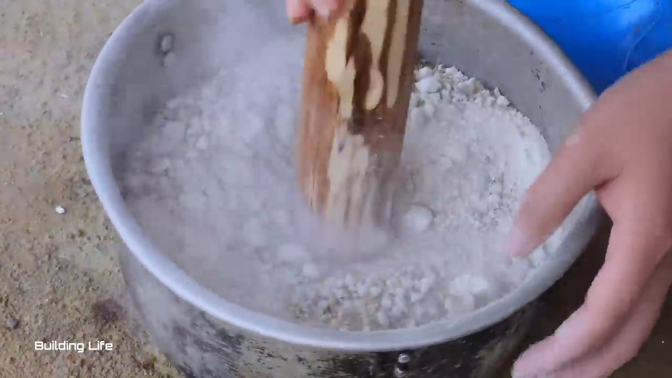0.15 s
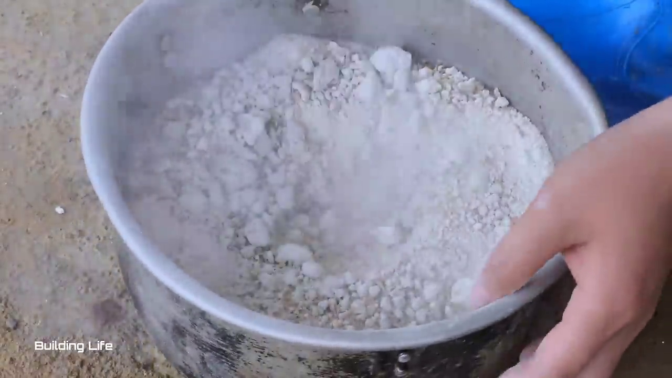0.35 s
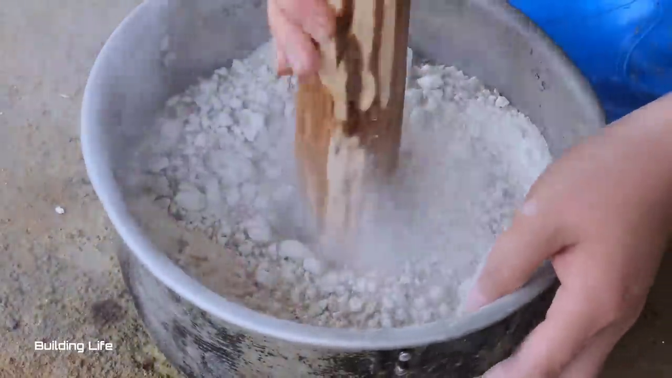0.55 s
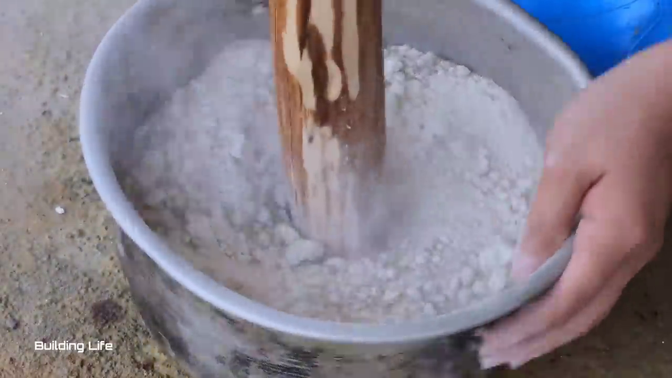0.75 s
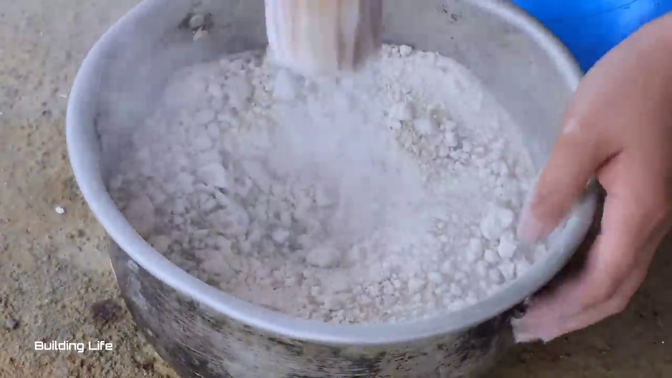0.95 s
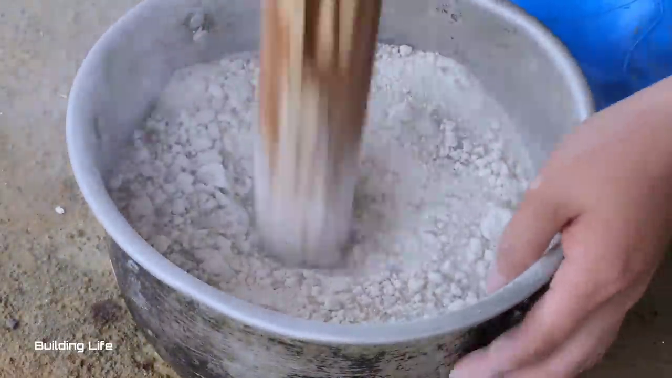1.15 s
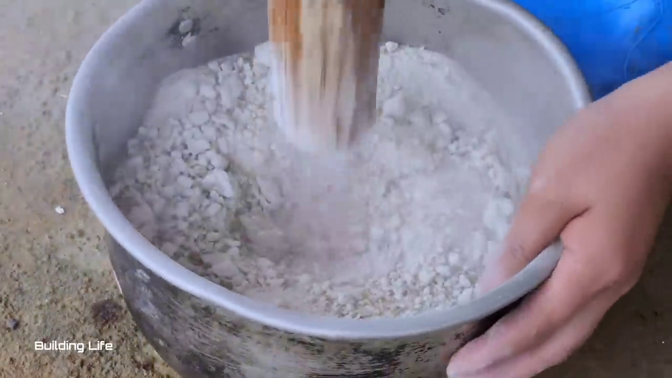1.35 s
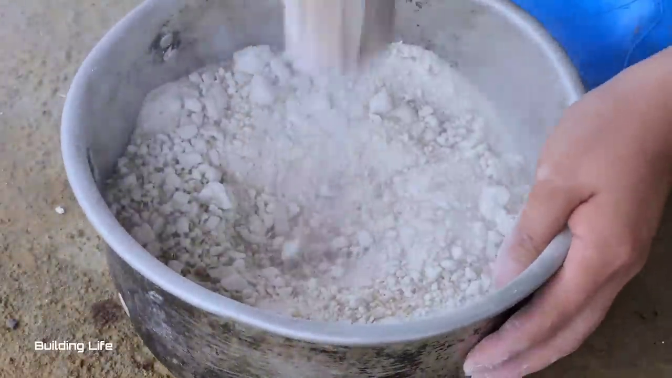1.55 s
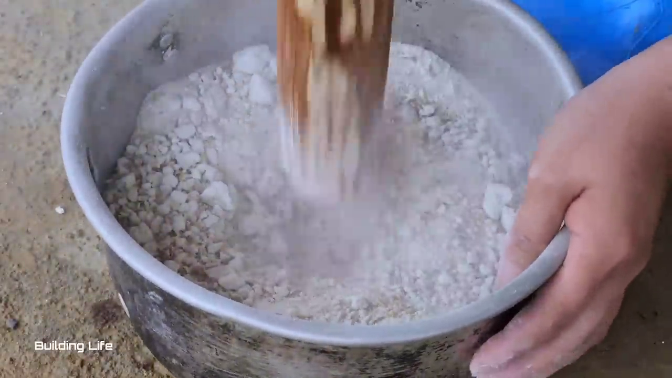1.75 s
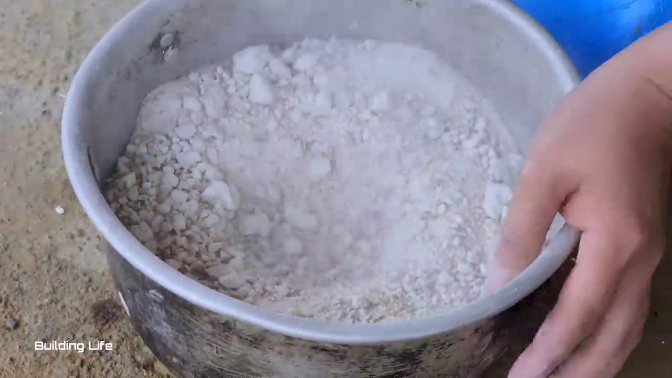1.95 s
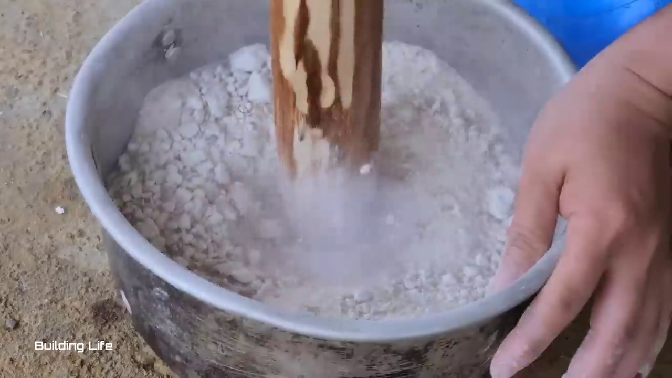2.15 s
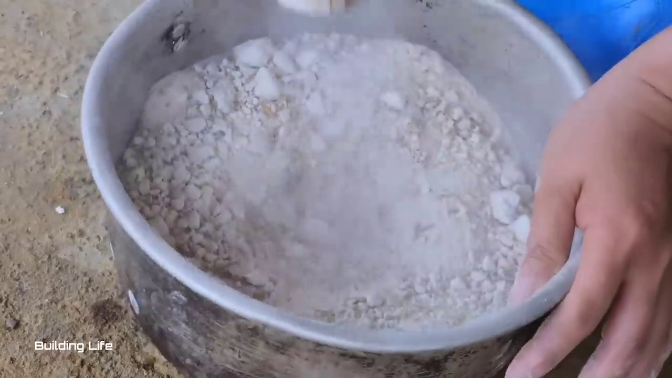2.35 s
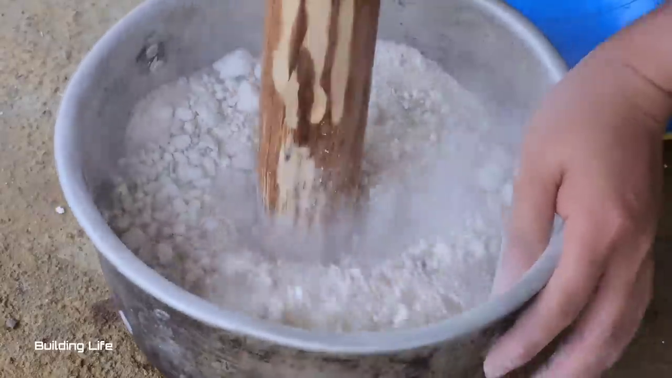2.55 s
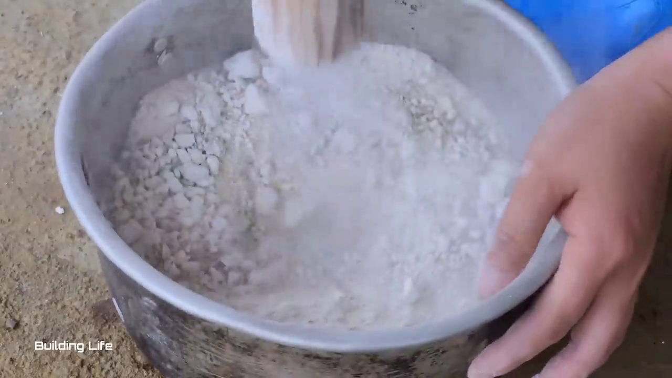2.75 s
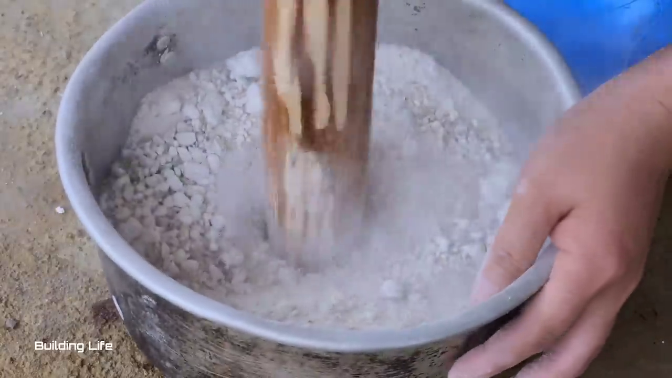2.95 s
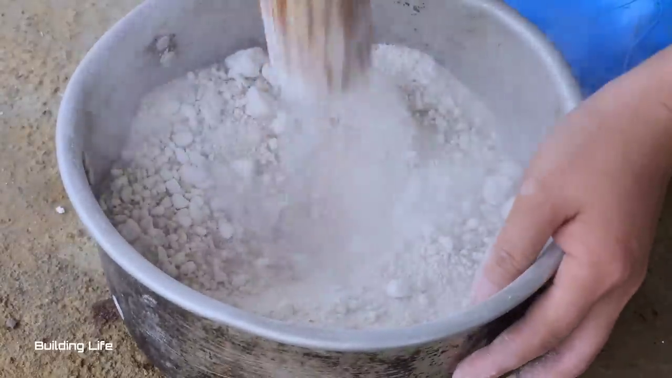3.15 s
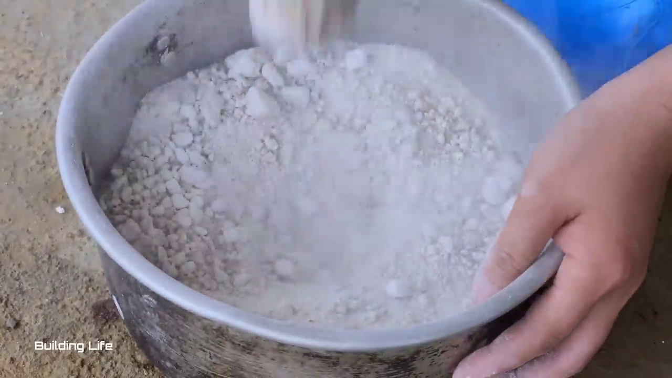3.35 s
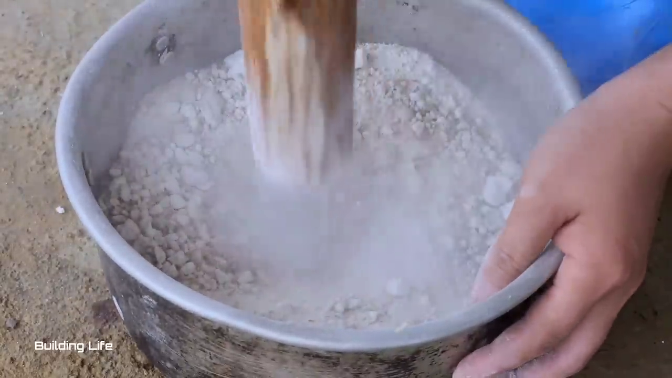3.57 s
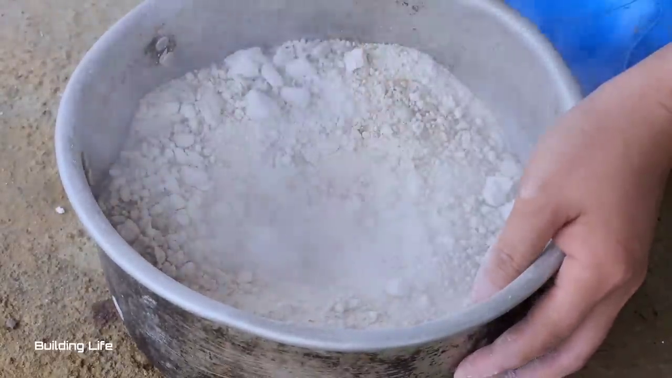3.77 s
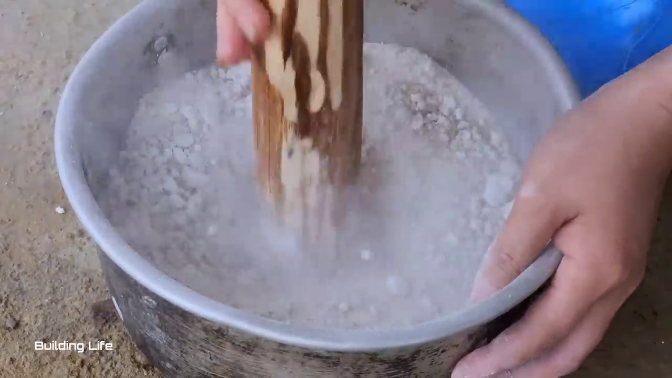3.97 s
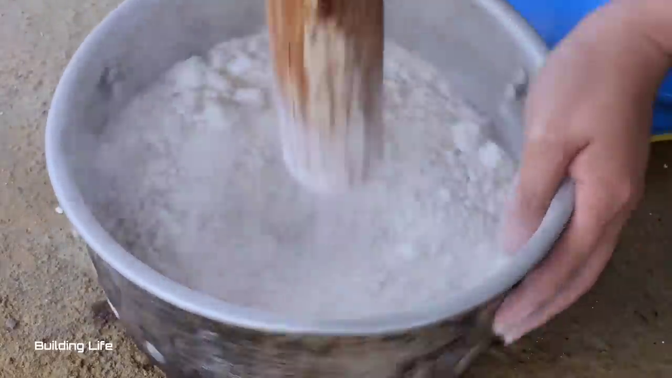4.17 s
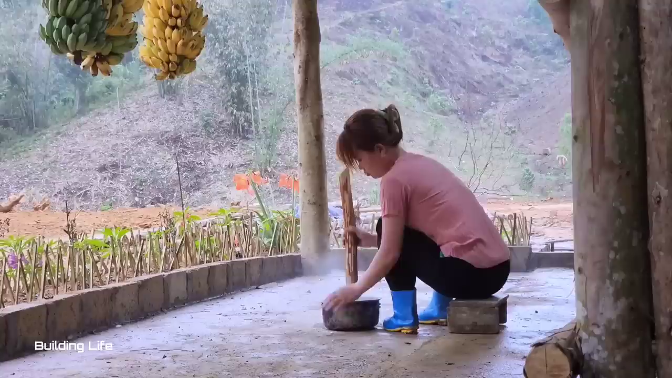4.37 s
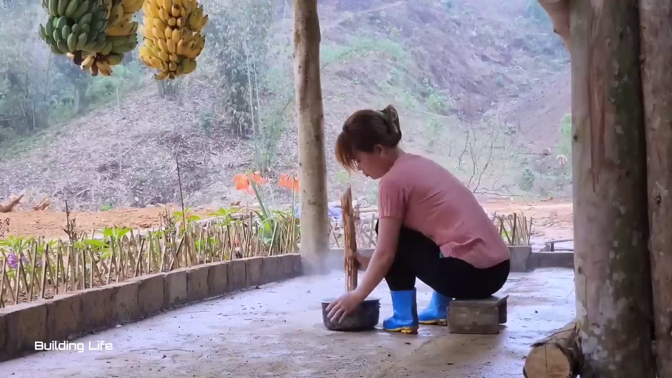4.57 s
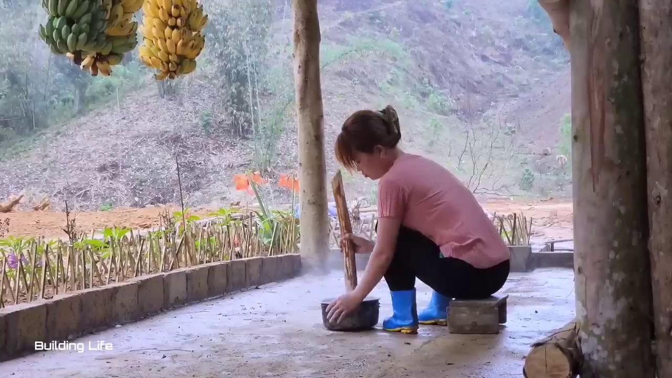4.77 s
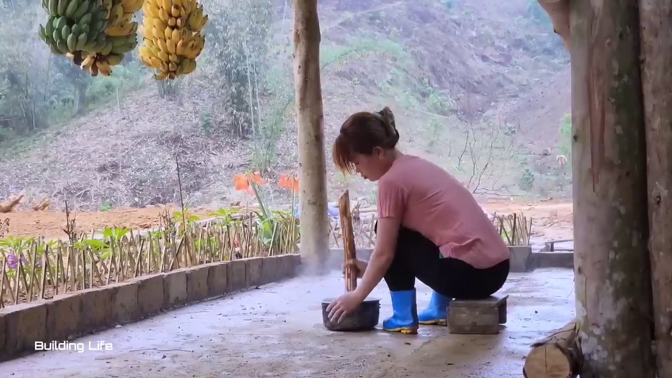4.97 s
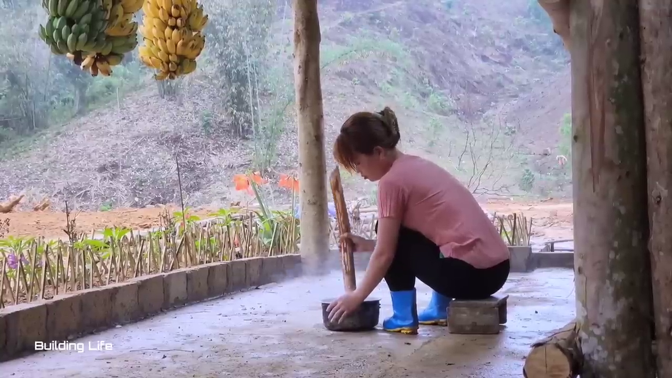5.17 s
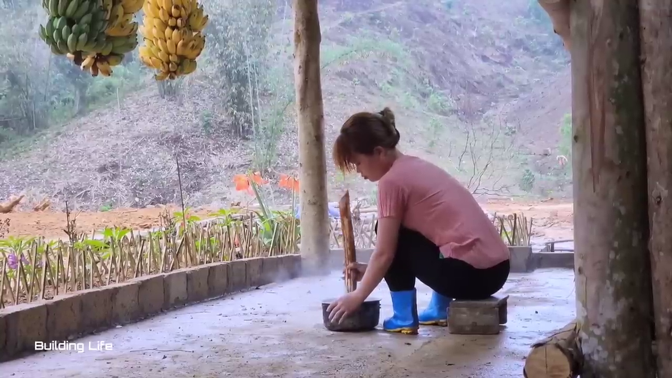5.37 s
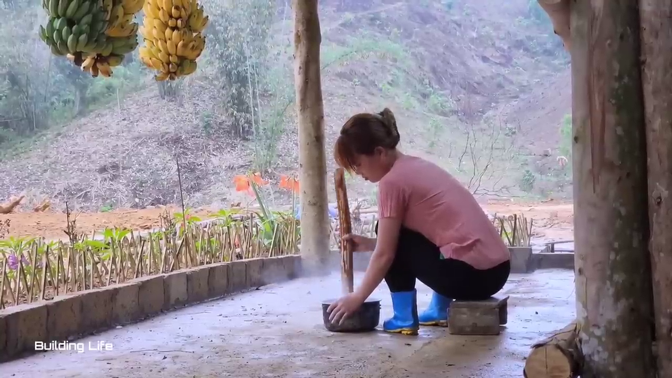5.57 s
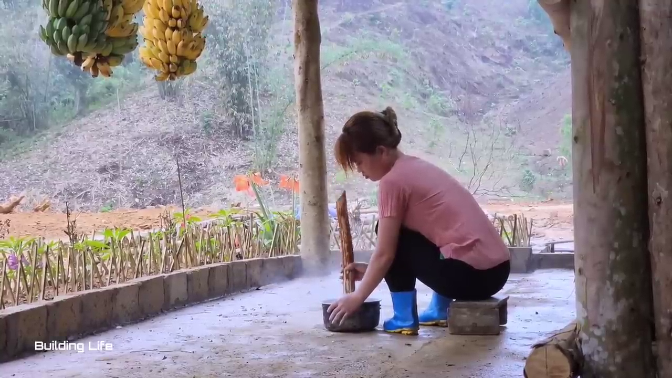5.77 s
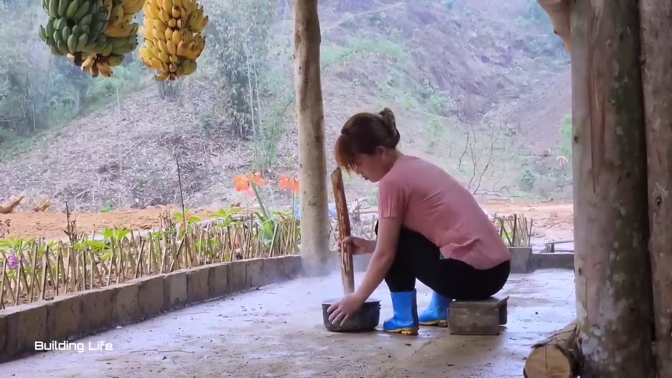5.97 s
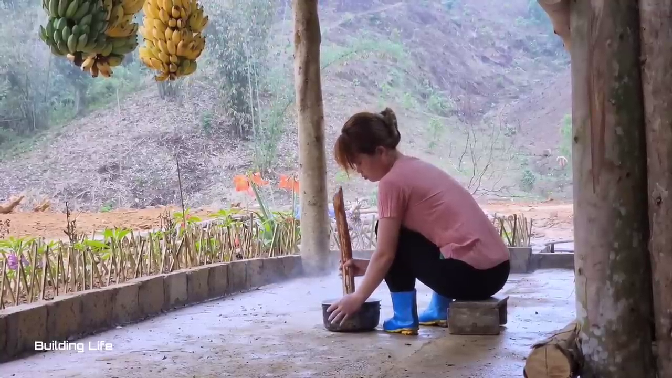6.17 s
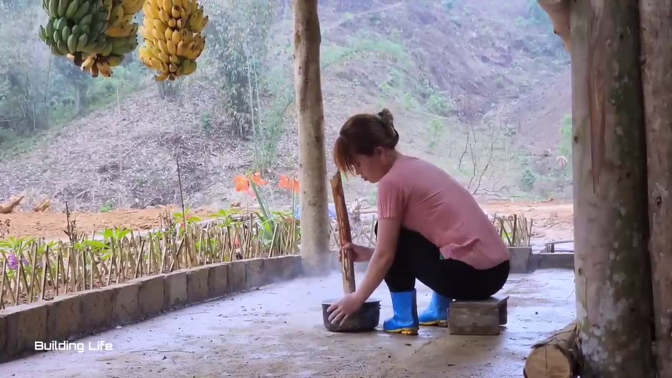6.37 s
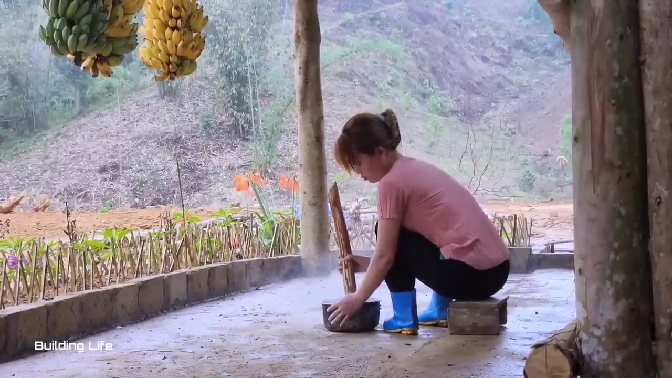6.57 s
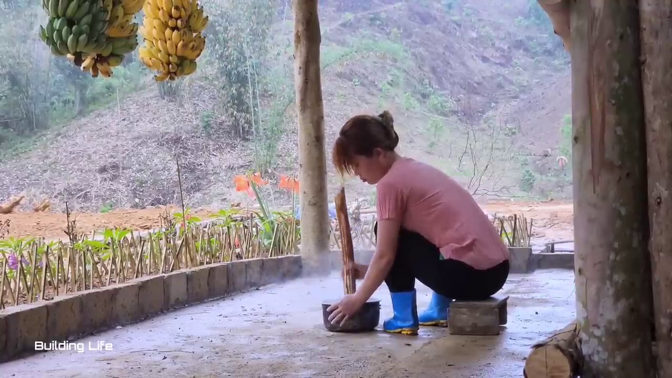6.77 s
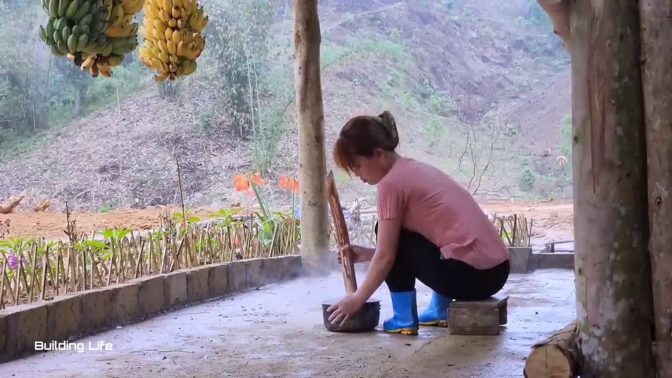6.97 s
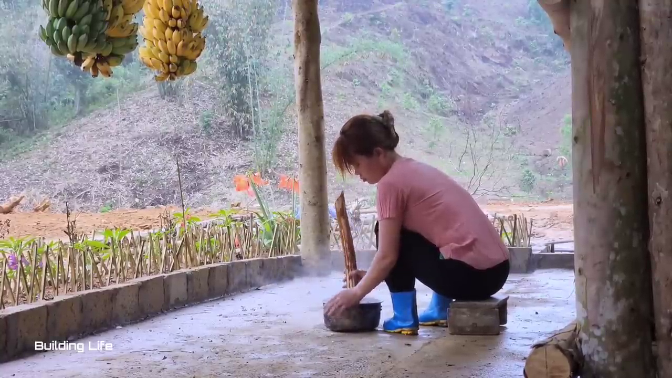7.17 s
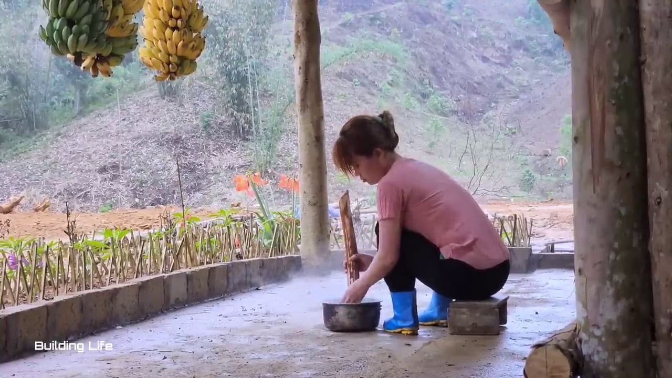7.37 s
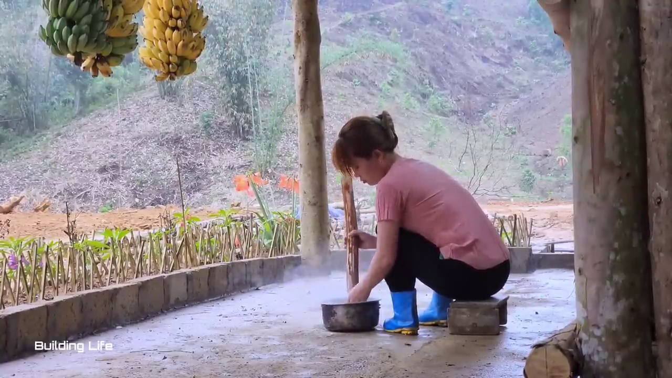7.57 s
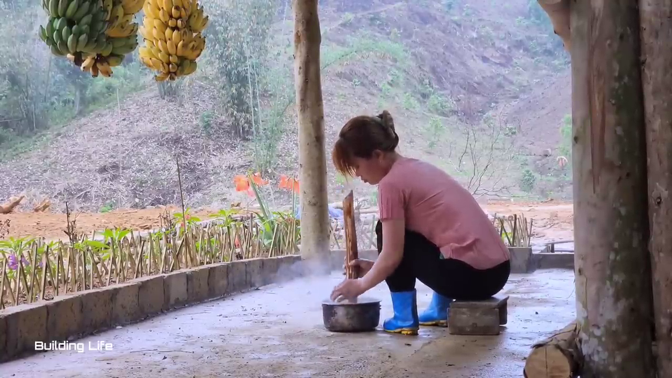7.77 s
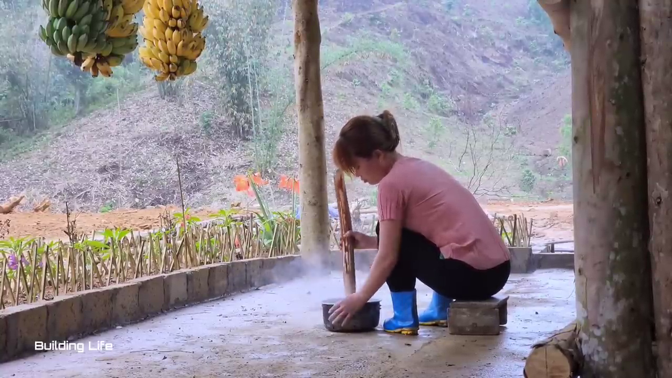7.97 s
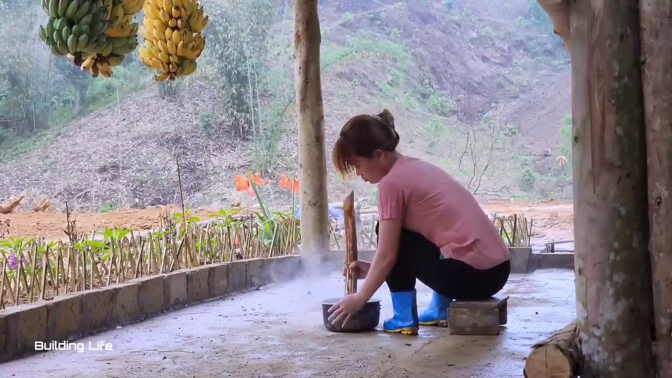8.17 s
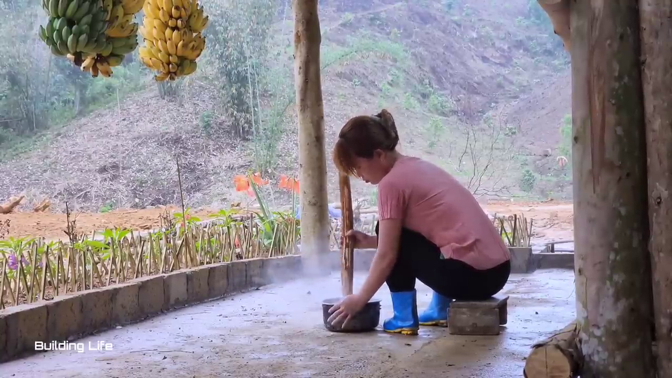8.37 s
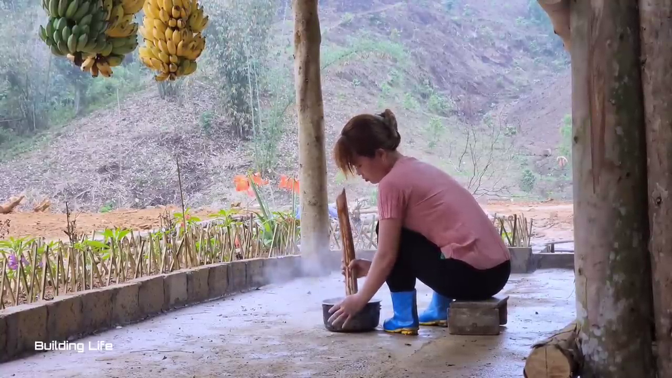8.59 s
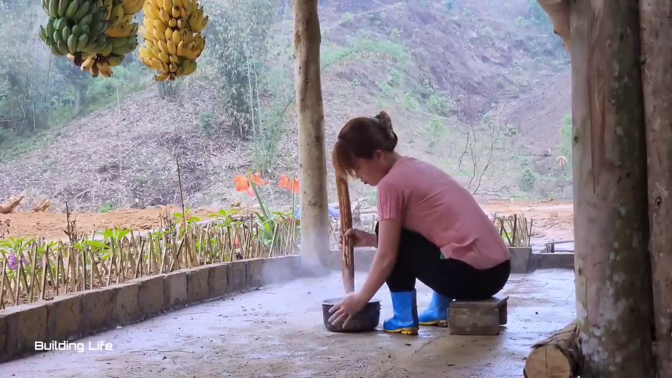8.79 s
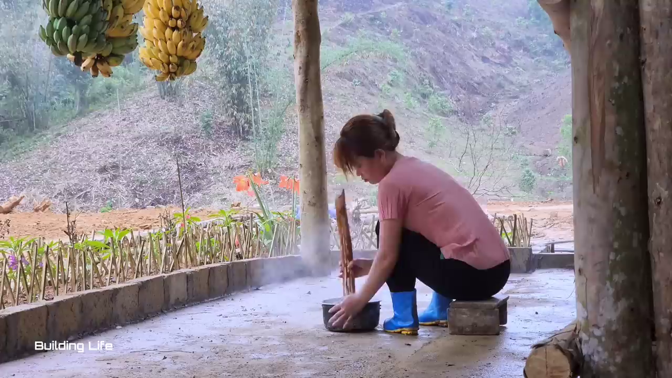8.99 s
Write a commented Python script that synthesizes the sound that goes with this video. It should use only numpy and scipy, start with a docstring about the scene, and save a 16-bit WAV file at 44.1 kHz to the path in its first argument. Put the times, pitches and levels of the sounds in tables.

```python
"""On a concrete porch, a wooden pestle pounds dry lumps in a metal pot, first close by, then a few metres off.
Each blow is a burst of crushed grit (uneven noise), then a thump of pot and slab (fading sine waves).
Between blows the pot is dragged round (noise through its ringing), crumbs tick and soft tones slide by.
The porch roof echoes it all (fading noise) over a faint country background with insects (filtered noise)."""
import sys
import numpy as np
from scipy import signal
from scipy.fft import rfft, irfft
from scipy.io import wavfile
from scipy.ndimage import uniform_filter1d

SR = 44100
rng = np.random.default_rng(int(sys.argv[2]) if len(sys.argv) > 2 else 0)


def wav_record(signal):
    """Record a signal, one row per channel, as 16-bit PCM in the file named by sys.argv[1]."""
    frames = np.transpose(np.atleast_2d(signal))
    bounded = np.clip(frames, -1, 1)
    # unit amplitude maps onto the largest positive 16-bit level
    quanta = np.round(bounded * 32767).astype(np.int16)
    wavfile.write(sys.argv[1], SR, quanta)


N = 398223

# Levels are those of each layer before it reaches the microphone.
# Country murmur and hiss: (frequency [Hz], relative level [dB])
COUNTRY_COLOUR = [(12, 6.5), (30, 3.5), (87, -1), (145, 0), (229, -6), (489, -21), (1000, -25), (2160, -31),
                  (4370, -32.5), (8000, -31), (10400, -47), (14800, -37.5), (16000, -52.5)]
# Insect bands: (centre [Hz], distance to the 20 dB weaker edges [Hz], average level [dB])
INSECT_BANDS = [(4500, 600, -84), (6500, 450, -81)]
# Pot dragged over the slab: (start [s], hold [s], rasp level [dB], rumble level [dB])
DRAGS = [(0.018, 0.056, -40.5, -38), (0.699, .04, -53, -40.5), (0.786, .11, -37, -34),
         (1.392, 0.11, -48, -37), (2.523, 0.021, -55.5, -44.5), (4.111, 0.092, -52.5, -59.5),
         (4.239, 0.056, -42.5, -37), (4.452, 0.11, -53.5, -41.5), (4.666, 0.03005, -54, -40.5),
         (5.631, 0.17, -67.5, -43), (7.272, .12, -55.5, -39), (7.599, .05, -71.5, -51.5)]
# Rasp of grit under the pot: (frequency [Hz], relative level [dB])
RASP_COLOUR = [(210, -43.5), (350, -23.5), (1010, -1), (1260, -7), (2030, -1), (2600, -7), (5310, -11),
               (10100, -14), (14800, -16.5), (16000, -41.5)]
# Crumbs and small knocks: (time [s], grit peak [dB], dust peak [dB], low knock peak [dB])
CRUMBS = [(0.019, -20, -28.5, -29.5), (0.326, -37.5, -48.5, -43.5), (0.704, -34, -43, -33.5),
          (0.73, -52, -34.5, -34.5), (0.772, -37, -40.5, -26.5), (0.797, -46, -16.5, -32.5),
          (0.848, -21, -42, -31), (0.864, -43, -25, -30.5), (0.89, -23.5, -39, -28.5),
          (0.928, -30.5, -34, -39.5), (1.053, -31, -21.5, -52), (1.277, -22.5, -56.5, -21.5),
          (1.386, -37, -46.5, -36.5), (1.426, -39, -36, -34.5), (1.474, -30.5, -36.5, -26.5),
          (2.511, -62, -41, -40.5), (2.779, -44, -55.5, -40), (2.835, -34.5, -30, -45.5),
          (3.289, -47, -36.5, -61), (3.305, -53.5, -32.5, -63.5), (4.117, -44, -34, -37),
          (4.189, -52, -32.5, -54.5), (4.316, -34.5, -50.5, -29), (4.392, -35.5, -40.5, -31.5),
          (4.448, -44, -59.5, -29), (4.487, -43.5, -60, -40), (4.505, -47, -33, -29),
          (7.379, -61, -58, -41.5), (7.591, -36.5, -65, -50), (7.736, -58, -48.5, -47.5),
          (8.07, -65, -57, -56)]
# Blows: (time [s], crunch peak [dB], slab thump peak [dB], pot bottom peak [dB], pot bottom pitch [Hz],
# side wall peak [dB], crush time scale [ms], time the pot stays pressed down [ms],
# treble of the grit over the crunch [dB])
BLOW_LIST = [(0.045, -26, -47.5, -18.5, 171.5, -32, 13, 19, -3),
             (0.147, -4, -9, -16, 211, -27.5, 4.3, 11, -9),
             (0.591, -3.5, -8.5, -22.5, 229, -12, 7.1, 13, -7),
             (1.231, -5, -11.5, -11.5, 206.5, -20.5, 7.5, 14, -9),
             (1.678, -4, -14, -25.5, 154.2, -14.5, 5.9, 12, -13.5),
             (2.118, -4.5, -13, -16.5, 186, -17.5, 8.8, 11, -11),
             (2.571, -3.5, -10, 1.5, 158.3, -19.5, 5, 8.6, -7),
             (3.018, -6.5, -9.5, -13, 196.5, -12.5, 6, 18, -7.5),
             (3.477, -5.5, -12.5, -17, 182.5, -8, 3.2, 23, -8.5),
             (3.938, -3.5, -11.5, -15, 199, -9.5, 5.4, 21, -12),
             (4.55, -6.5, -11.5, -5.5, 191.6, -23, 8.3, 13, -8.5),
             (4.568, -14.5, -11, -12.5, 148, -17.5, 3.4, 19, -9),
             (4.646, -24.5, -35.5, -45, 196, -27, 10.7, 18, 1),
             (5.034, -19, -45.5, -14, 174.9, -28, 6.3, 21, -2.5),
             (5.411, -23.5, -43.5, -23, 172.8, -24.5, 11, 12, -0.5),
             (5.779, -29.5, -27, -43, 134.5, -31.5, 14, 32, 4.5),
             (6.144, -27.5, -49.5, -21, 180.9, -33.5, 8.9, 21, 1),
             (6.494, -21, -32.5, -13.5, 173.1, -40, 5.6, 32, -2),
             (6.852, -17, -43.5, -15, 180.6, -31, 10, 27, -10),
             (7.214, -18.5, -38.5, -18.5, 173.1, -32, 16, 32, -9.5),
             (7.827, -25, -36, -25, 188.3, -32, 8.7, 21, -1.5),
             (8.194, -30, -31, -32.5, 179, -34.5, 10, 18, 1.5),
             (8.567, -28.5, -32.5, -27, 182.3, -33.5, 8.7, 32, 1),
             (8.962, -31.5, -34.5, -38.5, 127, -31.5, 8, 37, 1)]
# The pot springs back and lands again: (time [s], peak [dB], pitch [Hz])
REBOUND_LIST = [(0.172, -15, 149), (0.61, -9.5, 118.9), (1.254, -8, 156), (1.438, -25.5, 143),
                (1.698, -14.5, 124), (2.14, -5, 152.9), (2.591, -9.5, 172), (2.609, -9.5, 110),
                (3.956, -13, 106.6), (2.685, -25.5, 166.1), (4.578, -16, 157.7), (7.862, -22.5, 107.2),
                (7.883, -25.5, 135.2)]
# Body of the crunch, its treble, and settling powder coloured by the pot:
# (frequency [Hz], relative level [dB])
GRIT_COLOUR = [(300, -21), (700, -8.5), (1500, -0.5), (2400, -5.5), (3500, -14), (5000, -37)]
DUST_COLOUR = [(2500, -28), (4000, 3.5), (8000, 4), (12000, -3.5), (15800, -4.5)]
POWDER_COLOUR = [(350, -22.5), (700, -0.5), (1000, -5), (1400, -1.5), (2200, -2.5), (2600, -10), (3300, -9),
                 (5000, -30)]
# Ways the parts ring, before small random changes of pitch and level; t60 is the time to fade by 60 dB.
# Slab, loose pot bottom, air in the pot, wall damped by hand and powder, broad low ringing of the side wall:
# (frequency [Hz], relative level [dB], t60 [s])
SLAB_MODES = [(80, -6.5, 1), (104.4, 1.5, 0.52), (114, -0.5, .14), (131, -3.5, 0.63)]
BOTTOM_MODES = [(184, 0.8, 0.091)]
AIR_MODES = [(225, -4, 0.11), (253, -17, 0.17)]
WALL_MODES = [(1003.5, -2.5, 0.065), (1170, -12.5, 0.024), (1400, -1, .09), (1546, -4, 0.023),
              (1676, -8.5, 0.047), (1852, -2.5, 0.028), (2070, -7, 0.062), (2090, -2.5, 0.094),
              (2272, -12, 0.11), (2330, -7.5, 0.047), (2695, -11, 0.042)]
SIDE_WALL_MODES = [(405.4, -3.5, 0.067), (465, -10.5, 0.036), (607, 5.5, 0.029), (685.6, -12.5, 0.12)]
# Layers that follow the blow: (level at a 0 dB crunch [dB], gain per dB of crunch [dB])
AIR_RULE = (-14.5, .6)
SETTLE_RULE = (-30, 0.45)
# Faint sliding tones: (start [s], length [s], first pitch [Hz], last pitch [Hz], middle level [dB])
TONE_SLIDES = [(.93, .27, 262, 192, -56), (2.33, .16, 385, 455, -69), (3.83, .1, 880, 930, -69),
               (4.81, .09, 775, 795, -64), (4.83, .11, 527, 527, -67), (5.955, .04, 5650, 5880, -74)]
# Pot heard from the side and further off, then the stronger echo there: (frequency [Hz], gain [dB])
FAR_POT_COLOUR = [(10, -2), (200, 0.8), (600, -0.5), (1000, 0.5), (1900, 0.5), (3000, 0.5), (8000, -2),
                  (12000, -7), (21000, 2)]
FAR_ECHO_COLOUR = [(10, -0.5), (90, 10), (180, 6.8), (400, 8.5), (1800, 9), (6000, 3.5), (21000, 8.5)]
# Reflections off the microphone housing: (frequency [Hz], gain [dB])
HOUSING_COLOUR = [(150, -28), (400, -10), (2000, -9), (5000, -5), (8000, 0), (16000, -3)]
# Porch echo: (band centre [Hz], t60 [s], echo level [dB])
PORCH_BANDS = [(59, 0.27, -4.5), (141, 0.36, -18.5), (452, 0.32, -5.5), (1100, 0.1, -12), (3310, 0.1, -8.5),
               (5787, 0.23, -10), (11120, 0.21, -9)]

MOVE_S = 4.85  # from here on the pot is heard from the far place [s]
COUNTRY_DB, FAR_HISS_DB = -57.5, 3.5  # murmur level, and its gain at the far place [dB]
PUSH_DB_PER_S, STOP_DB_PER_S = 899.5, 349.5  # how fast a drag gets going and dies out [dB/s]
CRACKLE_PER_S, CRACKLE_DB = 76, -4.5  # snapping lumps [per s], their level against the rasp [dB]
RISE_S, SETTLE_S = .0022, 0.4  # time scale of the crunch rise, t60 of the settling powder [s]
SPILL_DB, SPILL_S = 2.5, .008  # lumps in the powder: level spread before smoothing [dB], length [s]
DUST_SETTLE, SIDE_SETTLE = .8, .3  # share of the settling powder in the treble and in the side wall
WALL_DB = -7  # wall peak against grit peak [dB]
BOTTOM_T60, REBOUND_T60, LOOSE_T60 = 0.52, 0.032, .3  # bottom, rebound, extra damping once let go [s]
BUILD_S, RELEASE_DB = 0.0023, -15.5  # thump build-up [s]; drop of the ring when the pestle lets go [dB]


def undb(db):
    """Turn decibels into a plain factor."""
    return 10 ** (np.asarray(db) / 20)


def unit(x):
    """Scale to an average (rms) strength of 1."""
    return x / np.sqrt(np.mean(x ** 2))


def peak(x, db):
    """Scale so the highest peak has this level."""
    return x * undb(db) / np.max(np.abs(x))


def colour(x, points):
    """Filter by (frequency [Hz], gain [dB]) points, almost silent outside them."""
    hz, db = np.transpose(points)
    f = np.fft.rfftfreq(x.shape[-1], 1 / SR) + 1
    gain_db = np.interp(np.log(f), np.log(hz), db, left=-90, right=-90)
    return irfft(rfft(x) * undb(gain_db), x.shape[-1])


def grains(size, spread_db):
    """Dense cracks: noise whose strength jumps every 8 samples, as uneven grains would."""
    noise = rng.standard_normal(size)
    jumps = np.repeat(rng.exponential(size=size // 8 + 1), 8)[:size]
    return noise * undb(spread_db * jumps)


def fall(t, t60):
    """Fading that starts at t = 0 and loses 60 dB in t60 seconds."""
    return (t >= 0) * np.exp(-np.log(1000) * np.maximum(t, 0) / t60)


def ring(t, modes, stretch=1):
    """A struck body rings as fading sine waves, a little different each time."""
    out = 0
    for hz, db, t60 in modes:
        level_chance, pitch_chance = rng.standard_normal(2)
        wave = np.sin(2 * np.pi * hz * (1 + .015 * pitch_chance) * t)
        out = out + undb(db + 2.5 * level_chance) * wave * fall(t, t60 * stretch)
    return out


def walk(rate):
    """Slow random wander with spread 1, from smoothed random steps."""
    k = int(SR / rate)
    steps = np.repeat(rng.standard_normal(N // k + 1), k)
    return unit(uniform_filter1d(uniform_filter1d(steps, k), k)[:N])


def add(out, x, s):
    """Mix x into out from time s."""
    i = int(s * SR)
    out[max(i, 0):i + len(x)] += x[max(-i, 0):N - i]


def law(rule, db):
    """Level that follows another level along a straight line."""
    return rule[0] + rule[1] * db


def country():
    """Low distant murmur of air, hiss and two insect bands: filtered noise that wanders in level."""
    mid, side = colour(rng.standard_normal((2, N)), COUNTRY_COLOUR)
    side = colour(side, [(20, -29.5), (250, -7), (2000, 3.5), (20000, -3.0)])
    far = np.arange(N) / SR > MOVE_S
    air_db = COUNTRY_DB + 1.2 * walk(4) + FAR_HISS_DB * far
    air = unit(mid + side * np.array([[1], [-1]])) * undb(air_db)
    for hz, width, db in INSECT_BANDS:
        band = colour(rng.standard_normal((2, N)), [(hz - width, -20), (hz, 0), (hz + width, -20)])
        air = air + unit(band) * undb(db + 1.5 * walk(3.8))
    return air


def drag():
    """Grit under the pot rasps through the wall ringing, snaps, and rumbles in the pot and slab."""
    t = np.arange(N) / SR
    grit = grains(N, 2.8) * undb(3.5 * walk(90))
    # the wall rings shorter here than under a blow
    wall = signal.fftconvolve(grit, ring(t[:SR // 4], SIDE_WALL_MODES + WALL_MODES, .45))[:N]
    rasp = unit(unit(colour(grit, RASP_COLOUR)) + 0.29 * unit(wall))
    hits = (rng.random(N) < CRACKLE_PER_S / SR) * undb(2.6 * rng.standard_normal(N))
    snaps = signal.fftconvolve(hits, fall(t[:SR // 50], 0.0037))[:N]
    rasp = rasp + undb(CRACKLE_DB) * unit(colour(snaps * rng.standard_normal(N), RASP_COLOUR))
    rubbing = grains(N, 3.9)
    low_ring = ring(t[:SR // 4], SLAB_MODES + AIR_MODES + BOTTOM_MODES, 0.99)
    rumble = unit(signal.fftconvolve(rubbing, low_ring)[:N])
    out = np.zeros(N)
    for s, hold_s, rasp_db, rumble_db in DRAGS:
        before, after = np.maximum(s - t, 0), np.maximum(t - s - hold_s, 0)
        motion = undb(-PUSH_DB_PER_S * before - STOP_DB_PER_S * after)
        out += motion * (undb(rasp_db) * rasp + undb(rumble_db) * rumble)
    return out


def ticks():
    """A sharp crack of grit and dust, with a dull knock where the pot touches the slab."""
    out, t = np.zeros(N), np.arange(SR // 4) / SR
    since = t - .005
    for s, grit_db, dust_db, knock_db in CRUMBS:
        cracks = grains(len(t), 3) * (fall(since, .012) + .3 * fall(since, .085))
        knock = ring(since, BOTTOM_MODES + AIR_MODES[:1])
        knock = np.convolve(knock, np.hanning(130))[:len(t)]  # smoothed to sound dull
        add(out, peak(colour(cracks, GRIT_COLOUR), grit_db), s - .005)
        add(out, peak(colour(cracks, DUST_COLOUR), dust_db), s - .005)
        add(out, peak(knock, knock_db), s - .005)
    return out


def crunch(since, crunch_db, side_db, crush_ms, dust_db):
    """Grit crushes ever louder until the pestle lands, shakes the pot walls, then settles as powder."""
    size, crush = len(since), max(crush_ms, 1) / 1000
    after = fall(np.maximum(since - 0.34 * crush, 0), 4.3 * crush)
    press = np.where(since < 0, np.exp(since / RISE_S), after)
    press = press + 0.99 * fall(since - .5 * crush, 0.003)  # the biggest lump snaps as the pestle bottoms out
    settle = undb(law(SETTLE_RULE, crunch_db) - crunch_db) * fall(since, SETTLE_S)
    lump = int(SPILL_S * SR)
    lumps = np.repeat(rng.standard_normal(size // lump + 1), lump)[:size]
    settle = settle * undb(SPILL_DB * uniform_filter1d(lumps, lump // 2))
    rough = grains(size, 2.0)
    grit = colour(rough * press, GRIT_COLOUR) + colour(rough * settle, POWDER_COLOUR)
    dust = colour(rough * (press + DUST_SETTLE * settle), DUST_COLOUR)
    jolts = grains(size, 2.7)
    t = np.arange(size) / SR
    wall = signal.fftconvolve(jolts * (press + 1.1 * settle), ring(t, WALL_MODES))[:size]
    side = signal.fftconvolve(jolts * (press + SIDE_SETTLE * settle), ring(t, SIDE_WALL_MODES))[:size]
    body = peak(peak(grit, 0) + peak(wall, WALL_DB), crunch_db)
    return body + peak(dust, crunch_db + dust_db) + peak(side, side_db)


def thump(landed, crunch_db, slab_db, bottom_db, bottom_hz, held_ms):
    """Slab, pot bottom and the air in the pot ring as the pestle lands."""
    # the powder cushions the landing, so the thump builds over a few milliseconds
    build = 1 - np.exp(-np.maximum(landed, 0) / BUILD_S)
    # the ring drops over 5 ms once the pestle lets go
    let_go = landed - held_ms / 1000
    held = undb(RELEASE_DB * np.clip(let_go / .005, 0, 1))
    # then the powder and the hand damp the bottom further
    loose = fall(np.maximum(let_go, 0), LOOSE_T60)
    bottom = build * ring(landed, [(bottom_hz, 0, BOTTOM_T60)]) * held * loose
    slab = build * ring(landed, SLAB_MODES) * held
    air = build * ring(landed, AIR_MODES)
    return peak(slab, slab_db) + peak(bottom, bottom_db) + peak(air, law(AIR_RULE, crunch_db))


def blows():
    """Each blow of the pestle crunches the lumps and thumps the pot and slab."""
    out, lead = np.zeros(N), .02  # room for the crunch to rise before the landing [s]
    since = np.arange(SR * 2 // 5) / SR - lead
    for s, crunch_db, slab_db, bottom_db, bottom_hz, side_db, crush_ms, held_ms, dust_db in BLOW_LIST:
        blow = crunch(since, crunch_db, side_db, crush_ms, dust_db)
        blow = blow + thump(since + 0.0012, crunch_db, slab_db, bottom_db, bottom_hz, held_ms)
        add(out, blow, s - lead + 0.0013)
    return out


def rebounds():
    """The pot springs back and lands on the slab again: a short low ring with a soft start."""
    out, t = np.zeros(N), np.arange(SR * 2 // 5) / SR
    for s, db, hz in REBOUND_LIST:
        landing = ring(t, [(hz, 0, REBOUND_T60)]) * np.minimum(t / 0.0045, 1)
        add(out, peak(landing, db), s)
    return out


def glides():
    """Soft tones that swell, slide and fade: sine waves with a wavering pitch and level."""
    out, t = np.zeros(N), np.arange(N) / SR
    for s, length_s, first_hz, last_hz, db in TONE_SLIDES:
        done = np.clip((t - s) / length_s, 0, 1)
        hz = (first_hz + (last_hz - first_hz) * done) * (1 + .012 * walk(25))
        swell = np.sqrt(np.abs(np.sin(np.pi * done)))
        out += undb(db + 2.5 * walk(40)) * swell * np.sin(2 * np.pi * np.cumsum(hz) / SR)
    return out


def ports(x, lag, pan_db):
    """Sound reaches two microphone ports a finger apart; the left hears it lag samples sooner."""
    turn = np.exp(-2j * np.pi * np.fft.rfftfreq(N) * lag)  # delays by part of a sample
    # the housing reflects a short smear, unlike at each port
    smear = rng.standard_normal((2, 1300)) * fall(np.arange(1300) / SR, .015)
    smear = smear / np.linalg.norm(smear[0])
    scatter = signal.fftconvolve(colour(x, HOUSING_COLOUR)[None], smear, axes=1)[:, :N]
    left = x * undb(pan_db / 2)
    right = irfft(rfft(x) * turn, N) * undb(-pan_db / 2)
    return np.array([left, right]) + scatter


def porch(x):
    """Blurred echo of fading noise, each band with its own fading; bass is nearly alike at both ports."""
    t, centres = np.arange(SR) / SR, [row[0] for row in PORCH_BANDS]
    tail = 0
    for k, (centre, t60, db) in enumerate(PORCH_BANDS):
        # each band slopes down to its neighbours; the outermost two reach further out
        band = [(hz, 0 if hz == centre else -25) for hz in centres]
        if k == 0:
            band = [(47, 0.0017)] + band
        if centre == centres[-1]:
            band = band + [(16000, 0.00051)]
        mid, side = colour(rng.standard_normal((2, len(t))), band) * fall(t - .008, t60)
        apart = min(centre / 2500, 1)
        # match the noise to the strength of a single click in this band
        click = colour(signal.unit_impulse(len(t)), band)
        match = np.sqrt(np.mean(click ** 2) / np.mean(mid ** 2))
        tail = tail + undb(db) * match * (mid + apart * side * np.array([[1], [-1]]))
    return signal.fftconvolve(x[None], tail, axes=1)[:, :N]


def scene():
    """Pot sounds and soft tones reach the ports directly and by way of the porch, over the country."""
    pot = blows() + rebounds() + ticks() + drag() + glides()
    far = np.arange(N) / SR > MOVE_S
    pot = np.where(far, colour(pot, FAR_POT_COLOUR), pot)
    direct = ports(pot * ~far, lag=2.4, pan_db=.5) + ports(pot * far, lag=.6, pan_db=.3)
    echo = porch(np.where(far, colour(pot, FAR_ECHO_COLOUR), pot))
    return direct + echo + country()


def record(dry):
    """The microphone loses the deepest bass, the loudest peaks round off, the top is cut."""
    low_cut = signal.butter(2, 70, "high", fs=SR, output="sos")  # 70 Hz
    top_cut = signal.ellip(8, .2, 70, 16000, fs=SR, output="sos")  # 16000 Hz
    thin = signal.sosfilt(low_cut, dry)
    rounded = np.tanh(1.265 * thin) / 0.97
    return signal.sosfilt(top_cut, rounded)


dry = scene()
out = record(dry)
wav_record(out)
```